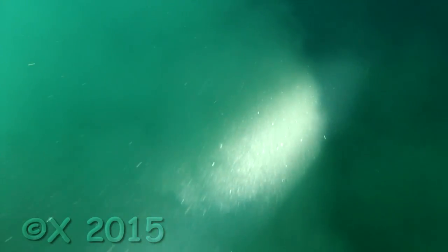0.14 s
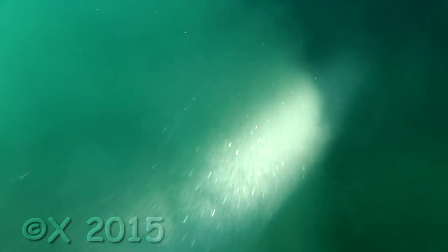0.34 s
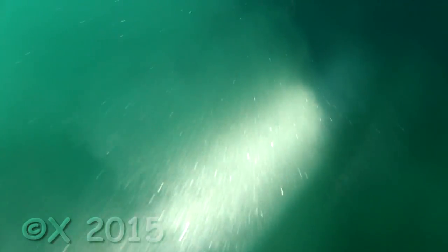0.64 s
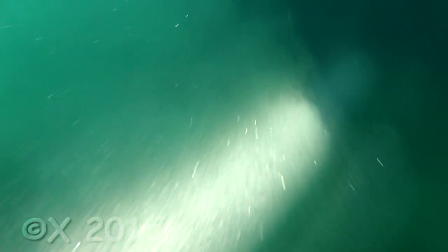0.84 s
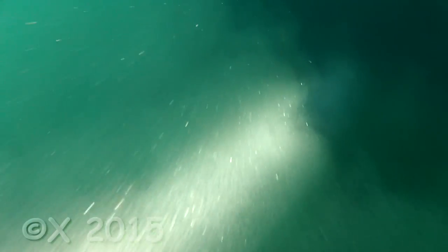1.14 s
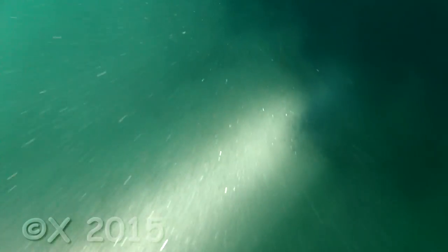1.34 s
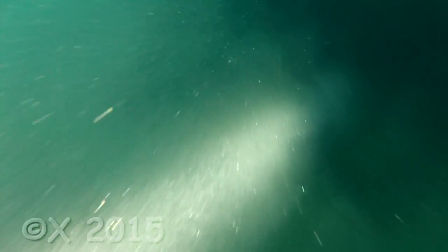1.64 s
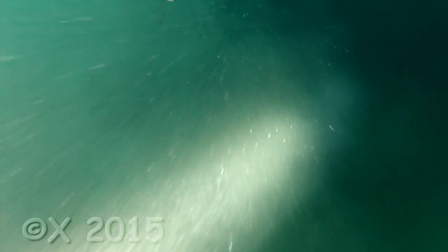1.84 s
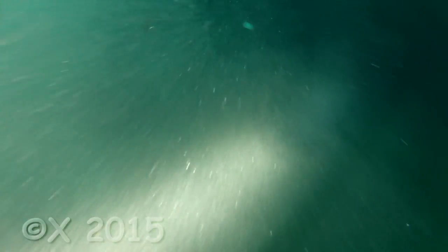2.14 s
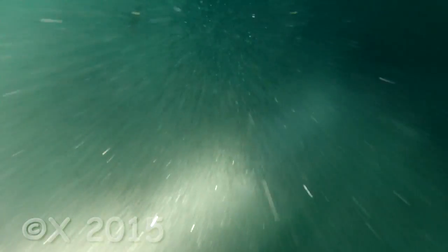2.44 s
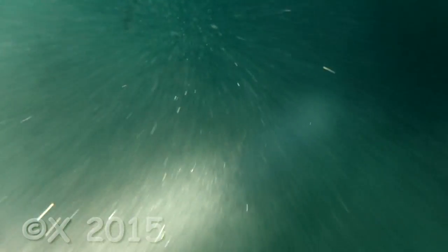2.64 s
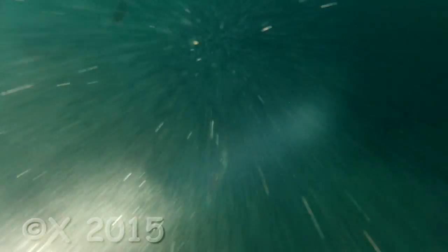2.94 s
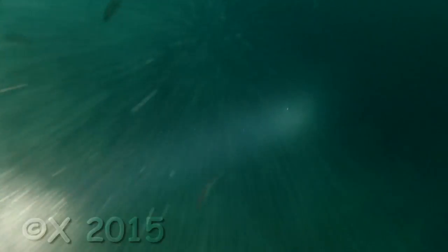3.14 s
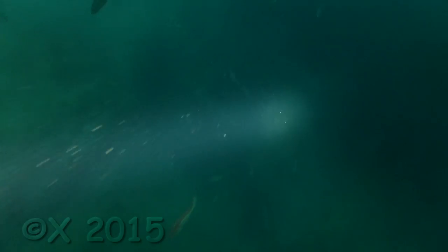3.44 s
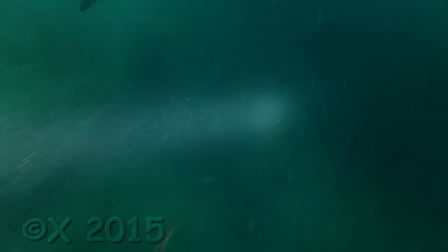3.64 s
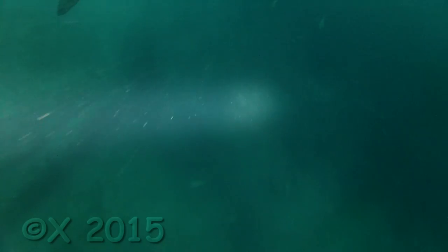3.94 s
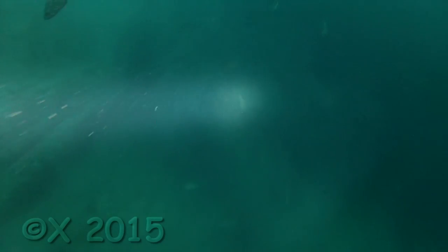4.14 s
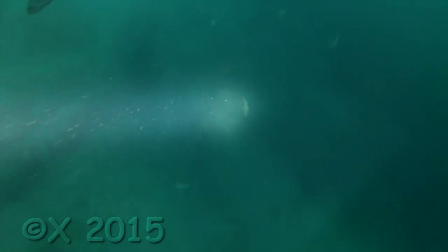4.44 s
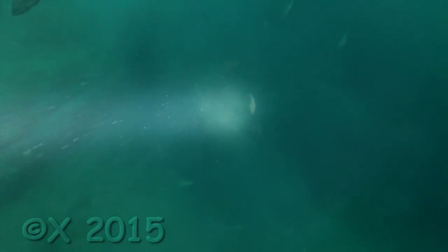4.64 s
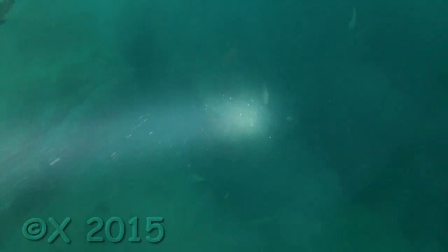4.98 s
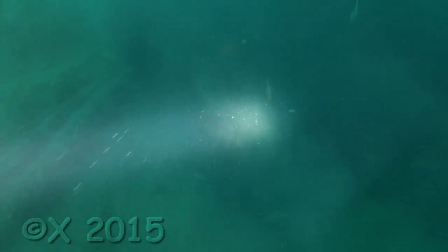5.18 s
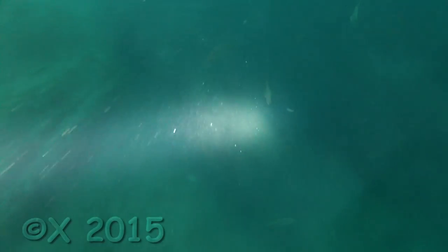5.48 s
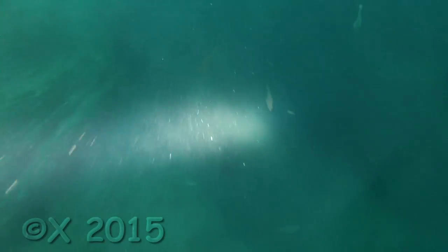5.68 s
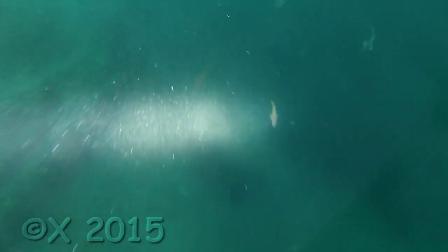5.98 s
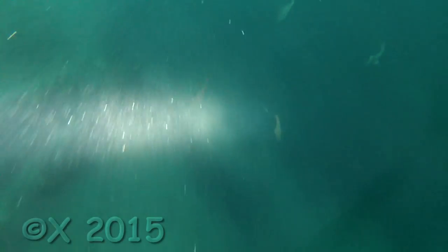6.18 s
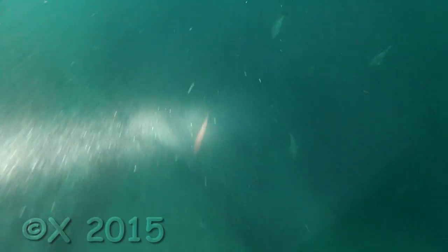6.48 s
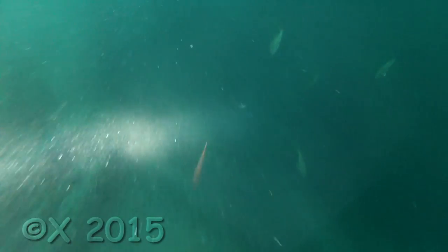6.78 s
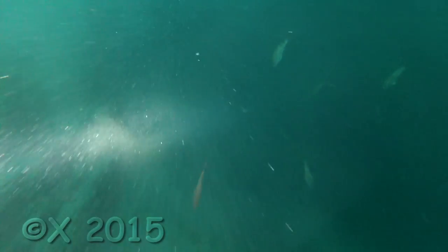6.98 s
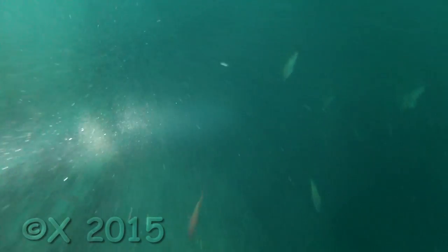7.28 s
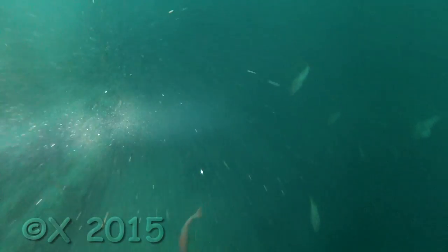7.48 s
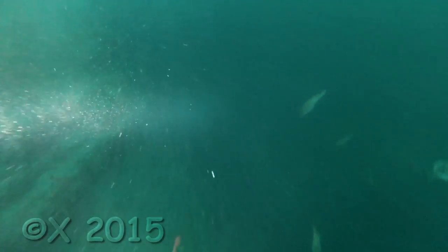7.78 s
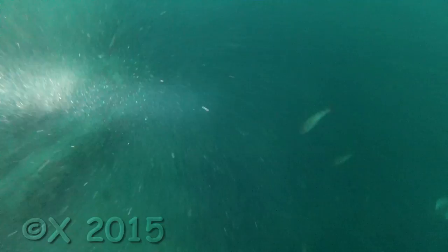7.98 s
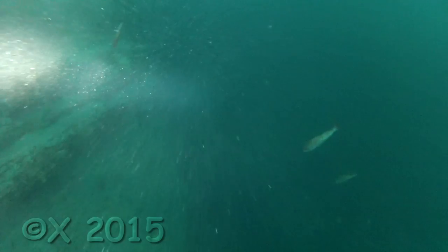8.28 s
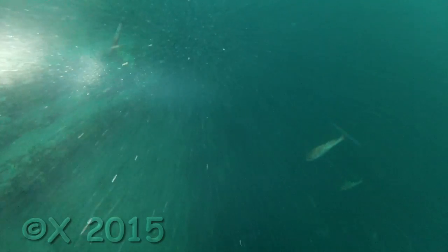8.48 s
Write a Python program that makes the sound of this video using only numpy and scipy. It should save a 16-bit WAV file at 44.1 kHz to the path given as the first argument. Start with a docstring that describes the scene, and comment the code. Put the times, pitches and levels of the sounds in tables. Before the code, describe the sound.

Underwater, an electric scooter motor holds a steady buzzing drone with fast gear rattle, soft water wash, small grit ticks and occasional mount knocks.

```python
"""An underwater diver's scooter cruises, heard at a camera housing that rides on it.
Its electric motor, geared down to a three-bladed propeller, hums in sines locked to the propeller angle.
Filtered clicks rattle on every shaft turn, the gear mesh sings and warbles, and shaped noise grinds.
Coloured noise makes the water wash past, with a gurgle near the end; noise scuffs are grit ticking on
the housing, and struck resonances are the mount knocking. A coarse sample-and-hold adds a fizz on top."""
import sys
import numpy as np
from scipy import signal
from scipy.fft import rfft, irfft, next_fast_len
from scipy.io import wavfile

SR = 44100
rng = np.random.default_rng(int(sys.argv[2]) if len(sys.argv) > 2 else 0)


def int16_out(signal):
    """Quantize to a 16-bit WAV file."""
    q = np.round(np.clip(np.atleast_2d(signal).T, -1, 1) * 32767)
    wavfile.write(sys.argv[1], SR, q.astype(np.int16))


N = 380141
TIME = np.arange(N) / SR   # seconds
GEAR_RATIO = 12   # motor shaft turns per propeller turn
BLADES = 3


def from_db(db):
    """Decibels to gain."""
    return 10 ** (np.asarray(db) / 20)


def rms_one(x):
    """Scale to unit power."""
    return x / np.sqrt(np.mean(x ** 2) + 1e-20)


def in_time(rows):
    """Read a breakpoint curve at every sample."""
    return np.interp(TIME, *np.transpose(rows))


def drift(rate_hz):
    """Slow random curve of unit rms: noise through two equal one-pole lowpasses at rate_hz."""
    step = 40   # samples between the points of the slow curve
    settle = 2000   # points dropped while the filter settles
    r = np.exp(-2 * np.pi * rate_hz * step / SR)
    noise = rng.standard_normal(N // step + settle + 2)
    slow = signal.lfilter([1], [1, -2 * r, r * r], noise)[settle:]
    return np.interp(np.arange(N) / step, np.arange(len(slow)), rms_one(slow))


def colour(white, spectrum):
    """Give unit white noise a spectrum in dB per Hz, interpolated over log frequency."""
    size = next_fast_len(N)
    hz, db = np.transpose(spectrum)
    bins_hz = np.maximum(np.arange(size // 2 + 1) * SR / size, 1)
    gain = from_db(np.interp(np.log(bins_hz), np.log(hz), db)) * np.sqrt(SR / 2)
    return irfft(rfft(white, size) * gain, size)[:N]


def resonate(x, hz, width_hz):
    """Two like resonances in series: a ring that swells briefly and has steep skirts."""
    r = np.exp(-np.pi * width_hz / SR)
    top = (1 - r * r) / 2
    section = [top, 0, -top, 1, -2 * r * np.cos(2 * np.pi * hz / SR), r * r]
    return signal.sosfilt([section] * 2, x + 1e-18)


def bursts(rows, decay_s, attack_s):
    """Short noisy scuffs that swell and die, one for each row of (start_s, relative level_db)."""
    starts = np.zeros(N)
    for start_s, level_db in rows:
        starts[int(np.clip(start_s * SR, 0, N - 1))] += from_db(level_db)
    rise, fall = np.exp(-1 / (attack_s * SR)), np.exp(-1 / (decay_s * SR))
    envelope = signal.lfilter([1 - rise], [1, -rise - fall, rise * fall], starts + 1e-18)
    return envelope * rng.standard_normal(N)


def hum(prop_turns, lean_turns=0.026, flutter=0.017):
    """Motor and blade harmonics; the unbalanced propeller swells and sways them once a turn."""
    # hum harmonics: order [cycles per propeller turn], level_db [rms, before throb and flutter],
    # throb [share of height, negative dips], sway [phase, radians]
    harmonics = [(6, -62, 0, -0.21), (9, -48, -0.07, -0.47), (12, -38, 0.24, 0.082),
                 (18, -55.5, 0.15, 0.13), (21, -67, 0.16, -0.34), (24, -34, -0.36, -0.35),
                 (36, -37, 0.026, 0.68), (42, -66, -0.4, -0.62), (48, -56.5, -0.039, 0.8),
                 (54, -61.5, 0.085, 0.29), (60, -54.5, 0.45, 0.37), (66, -53.5, 0.054, -0.53),
                 (78, -57.5, -0.43, -0.41), (84, -45, -0.43, 0.62), (96, -67, -0.24, 0.25),
                 (108, -66.5, -0.14, 0.39), (120, -55.5, -0.064, 1), (165, -70, 0.091, 0.75),
                 (180, -56.5, -0.54, -0.05)]
    angle = 2 * np.pi * prop_turns
    unbalance = np.cos(angle + 2 * np.pi * lean_turns)
    load = 1 + flutter * drift(16.0)
    out = np.zeros(N)
    for order, level_db, throb, sway in harmonics:
        blade_order = BLADES * round(order / BLADES)   # whole multiples of the blade count
        wave = np.sin(blade_order * angle + sway * unbalance + 2 * np.pi * rng.random())
        out += from_db(level_db) * load * (1 + throb * unbalance) * wave
    return np.sqrt(2) * out


def boom(prop_turns, trim_db=0.35, order=15, flutter=.2, flutter_hz=6.6, sway=0.091):
    """The blade harmonic that the hull resonates with, fluttering as the blades meet uneven water."""
    # slow level of this harmonic: time_s, level_db [rms, before trim and flutter]
    boom_level = [(0.0, -29), (0.4, -33.3), (0.66, -30), (2.3, -34.5), (2.46, -28.5), (2.8, -33),
                  (3.24, -30.1), (3.4, -35.5), (3.74, -29.2), (4.48, -29.5), (4.64, -32), (6.32, -28.5),
                  (6.64, -33.5), (6.84, -29.0), (7.0, -34), (8.28, -30.5), (8.4, -42), (8.62, -30.5)]
    strength = from_db(in_time(boom_level) + trim_db) * (1 + flutter * drift(flutter_hz))
    sway_radians = sway * drift(flutter_hz)
    angle = 2 * np.pi * (order * prop_turns + rng.random()) + sway_radians
    return np.sqrt(2) * strength * np.sin(angle)


def rattle(shaft_turns, jitter_s=0.00014, wander_s=.0001, sway_s=.00007, blade_shift_s=.00006,
           uneven_db=3.5, top_hz=3700):
    """Contacts ring every shaft turn, wander with gear play and propeller; loose ones also scatter."""
    # contacts within one shaft turn: place [turns, 0-1], ring_hz, width_hz [of each resonance],
    # level_db [rms before the lowpass and the swing in scene], loose [0-1]
    contacts = [(.30, 1383, 198, -51, 0.54), (.68, 1420, 310, -50, 0.5), (.50, 2338, 198, -49, .1),
                (.51, 2633, 253, -49.5, .1), (.51, 2830, 140, -57, 0.2), (.79, 2086, 196, -51.5, 0.95),
                (.17, 2550, 750, -54, 0.4), (.81, 3380, 160, -60, 0.6)]
    out = np.zeros(N)
    turns = np.arange(int(shaft_turns[-1]) + 1)
    play_s = wander_s * drift(14) + sway_s * np.cos(2 * np.pi * shaft_turns / GEAR_RATIO)
    for place, ring_hz, width_hz, level_db, loose in contacts:
        late, strength = rng.standard_normal((len(turns), 2)).T
        blade_load = np.sin(2 * np.pi * (turns * BLADES / GEAR_RATIO + rng.random()))
        hit_s = np.interp(turns + place, shaft_turns, TIME + play_s, right=-1)   # -1: past the end
        hit_s = hit_s + loose * (jitter_s * late + blade_shift_s * blade_load)
        heard = (hit_s > 0) & (hit_s < TIME[-1])
        clicks = np.zeros(N)
        click_db = loose * uneven_db * np.minimum(strength[heard], 2)
        clicks[(hit_s[heard] * SR).astype(int)] = from_db(click_db)
        out += from_db(level_db) * rms_one(resonate(clicks, ring_hz, width_hz))
    return signal.sosfilt(signal.butter(10, top_hz, fs=SR, output="sos"), out)


def grind(prop_turns, repeat_share=0.59):
    """The same tooth flaws come round on every propeller turn, mixed with fresh friction noise."""
    # gear teeth grinding in the hull: frequency_hz, density_db [dB per Hz]
    grind_spectrum = [(130, -85), (170, -69.5), (275, -62), (350, -74.5), (460, -74.5), (545, -72.5),
                      (690, -68.5), (750, -71.5), (840, -93), (980, -80.5), (1400, -77.5), (1780, -83),
                      (2350, -77), (3200, -84), (3720, -86.5), (4000, -112)]
    size = 5376   # points of flaw noise round one propeller turn
    flaws = rms_one(irfft(np.exp(2j * np.pi * rng.random(size // 2 + 1))))
    repeating = np.interp(prop_turns % 1 * size, np.arange(size), flaws)
    share = np.clip(repeat_share, 0, 1)   # share of power
    fresh = rng.standard_normal(N)
    return colour(np.sqrt(share) * repeating + np.sqrt(1 - share) * fresh, grind_spectrum)


def warble(prop_turns, swing=1.3, from_hz=170, to_hz=-110, length_s=.17, place=.55,
           scatter_turns=.08, uneven_db=1.5):
    """About once a propeller turn an offset from the mesh tone, as a complex wave, slides down past it."""
    out = np.zeros(N, complex)
    for turn in range(int(prop_turns[-1]) + 1):
        late, strength, phase = rng.standard_normal(3)
        middle_s = np.interp(turn + place + scatter_turns * late, prop_turns, TIME)
        first = max(int((middle_s - length_s / 2) * SR), 0)
        last = min(int((middle_s + length_s / 2) * SR), N)
        at = np.arange(first, last)
        progress = (TIME[at] - middle_s) / length_s + .5
        offset_hz = from_hz + (to_hz - from_hz) * progress
        swell = swing * from_db(uneven_db * strength) * np.sin(np.pi * progress) ** 2
        out[at] += swell * np.exp(2j * np.pi * (np.cumsum(offset_hz) / SR + phase))
    return out


def mesh(prop_turns, level_db=-37.5, order=72, shake=0.37, swell_share=0.39, low_hz=500, high_hz=765):
    """The gear mesh sings through the hull; shaft twist shakes its phase, the warble phase and strength."""
    slide = warble(prop_turns)
    twist_band = signal.butter(2, [25, 115], "band", fs=SR, output="sos")
    twist = rms_one(signal.sosfilt(twist_band, rng.standard_normal(N)))
    angle = 2 * np.pi * order * prop_turns + slide.imag + shake * twist   # shake in radians
    tone = (1 + swell_share * slide.real) * np.sin(angle)
    hull = signal.butter(4, [low_hz, high_hz], "band", fs=SR, output="sos")
    return from_db(level_db) * rms_one(signal.sosfilt(hull, tone))


def whine():
    """Thin steady sines that do not follow the shaft."""
    # whine of the speed controller: pitch_hz, level_db [rms]
    whine_tones = [(1402, -73), (2803, -66)]
    tones = sum(from_db(level_db) * np.sin(2 * np.pi * pitch_hz * TIME) for pitch_hz, level_db in whine_tones)
    return np.sqrt(2) * tones


def water():
    """Noise coloured as the steady propeller wash, and a hollow gurgle of resonant noise."""
    # propeller wash: frequency_hz, density_db [dB per Hz]
    wash_spectrum = [(10, -99), (20, -74), (30, -53.5), (45, -63.5), (62, -70.5), (95, -62), (122, -57),
                     (160, -66), (275, -70), (350, -75), (850, -86.5), (3600, -96.5), (4100, -102),
                     (6000, -108)]
    # gurgle of water round the housing: time_s, level_db [rms]
    gurgle_level = [(0, -79), (8.1, -74), (8.35, -43.5), (8.62, -43)]
    gurgle = rms_one(resonate(rng.standard_normal(N), hz=450, width_hz=270))
    wash = colour(rng.standard_normal(N), wash_spectrum)
    return wash + from_db(in_time(gurgle_level)) * gurgle


def grit(clear_db=1, faint_db=-62, spread_db=3, decay_s=0.0052, attack_s=0.0014, low_hz=2400,
         top_hz=5000, count=40):
    """Specks in the stream scuff the housing: a few clear ones among many faint ones."""
    # clear grit strikes: start_s, level_db [relative, before clear_db, envelope, noise and band filter]
    clear = [(0.5911, -43), (0.7831, -46), (1.1134, -33), (1.1618, -37), (1.898, -41), (1.9889, -41),
             (2.3935, -43), (2.4638, -42), (4.6463, -32), (6.0272, -45), (6.2956, -39), (6.7131, -40),
             (7.3262, -40), (7.9882, -42), (8.1025, -33.5)]
    faint = [(rng.random() * TIME[-1], faint_db + spread_db * rng.standard_normal()) for _ in range(count)]
    ticks = from_db(clear_db) * bursts(clear, decay_s, attack_s) + bursts(faint, decay_s, attack_s)
    band = signal.butter(2, [low_hz, top_hz], "band", fs=SR, output="sos")
    return signal.sosfilt(band, ticks)


def knocks(scuff_db=10, strike_db=34, ring_width_hz=700, thump_db=55, decay_s=0.0042, attack_s=0.00018,
           top_hz=2800, scuff_width_hz=2500):
    """The mount strikes, rings briefly and scuffs, and the hull answers with a low thump."""
    # knocks of the mount: start_s, clack_db [relative, before gains and filters], ring_hz,
    # low_db [relative thump level, before thump_db and the resonance]
    mount_hits = [(2.589, -28, 1680, -42), (4.647, -28, 1510, -46), (6.455, -29.5, 1900, -44),
                  (7.435, -25.5, 1970, -20), (8.559, -29.5, 1500, -51)]
    clack, push = np.zeros(N), np.zeros(N)
    for start_s, clack_db, ring_hz, low_db in mount_hits:
        strike = signal.unit_impulse(N, int(start_s * SR))
        clack += from_db(clack_db + strike_db) * resonate(strike, ring_hz, ring_width_hz)
        scuff = bursts([(start_s, clack_db)], decay_s, attack_s)
        clack += from_db(scuff_db) * resonate(scuff, ring_hz, scuff_width_hz)
        push += from_db(low_db) * strike
    clack = signal.sosfilt(signal.butter(4, top_hz, fs=SR, output="sos"), clack)
    return clack + from_db(thump_db) * resonate(push, hz=129.7, width_hz=30)


def scene(rattle_swing_db=0.48, slip_turns=.007, slip_hz=3):
    """One shaft speed drives hum, boom, rattle, gear mesh and grinding; the rest runs free of it."""
    # motor shaft pace, before the slip is added: time_s, speed [turns per s]
    shaft_speed = [(0.0, 98.18), (1.08, 98.48), (1.24, 97.93), (2.28, 98.7), (2.46, 98.15), (3.0, 98.76),
                   (3.16, 98.45), (3.36, 98.77), (4.76, 98.42), (6.04, 99.3), (6.4, 97.46), (6.96, 99.14),
                   (7.16, 98.99), (7.4, 99.97), (7.64, 98.6), (7.84, 99.39), (8.24, 98.1), (8.62, 98.86)]
    # the shaft runs slightly ahead of and behind that pace
    shaft_turns = np.cumsum(in_time(shaft_speed)) / SR + slip_turns * drift(slip_hz)
    prop_turns = shaft_turns / GEAR_RATIO
    motor = hum(prop_turns) + boom(prop_turns)
    swinging_rattle = from_db(rattle_swing_db * drift(5.2)) * rattle(shaft_turns)
    gears = swinging_rattle + grind(prop_turns) + mesh(prop_turns)
    return (motor + gears + whine() + water() + grit() + knocks())[None]


def record(dry, hold_hz=12000, cutoff_hz=15100):
    """Sampled slowly and each sample held, which mirrors the sound around hold_hz; then the top is cut."""
    slow = signal.resample_poly(dry, hold_hz, SR, axis=1, window=("kaiser", 8))   # soft-edged filter
    steps = np.repeat(slow, 4, axis=1)
    held = signal.resample_poly(steps, SR, 4 * hold_hz, axis=1)[:, :N]
    return signal.sosfilt(signal.ellip(10, .2, 70, cutoff_hz, fs=SR, output="sos"), held)


dry = scene()
out = record(dry)
int16_out(out)
```